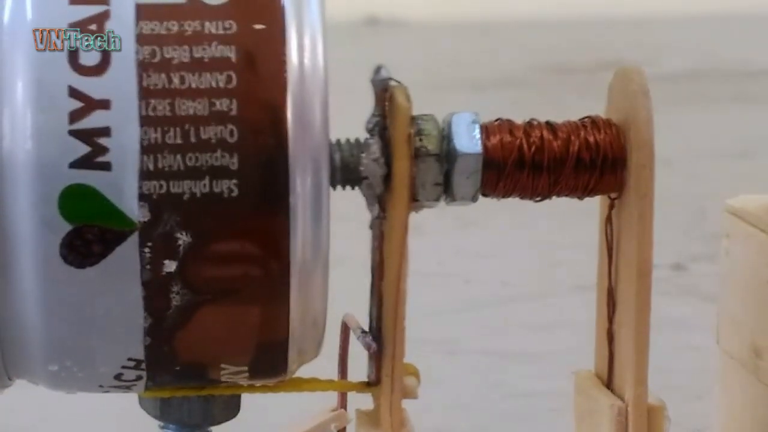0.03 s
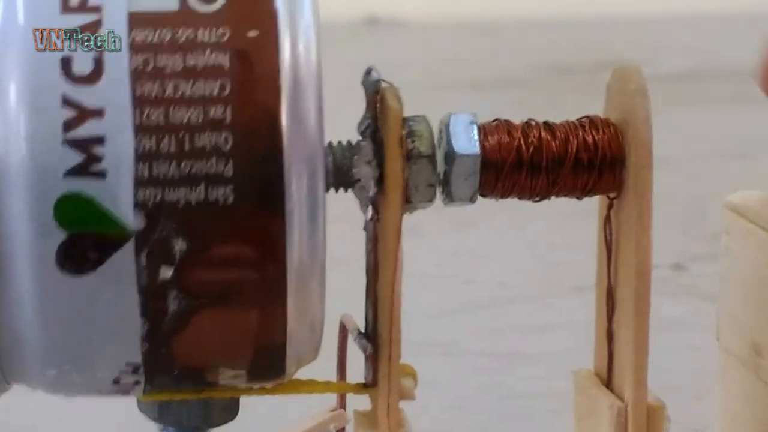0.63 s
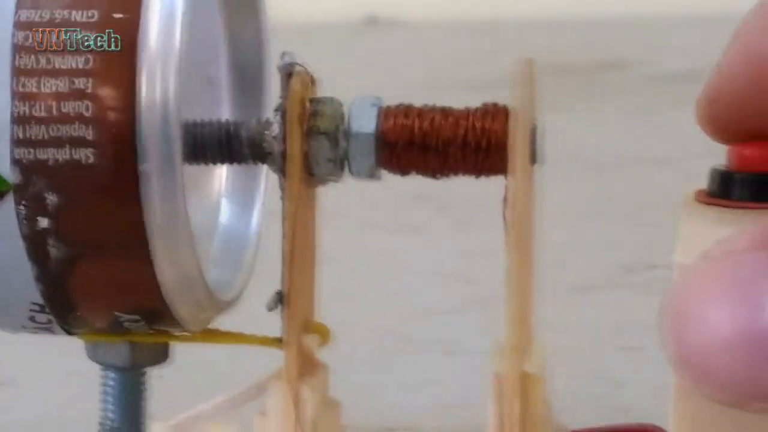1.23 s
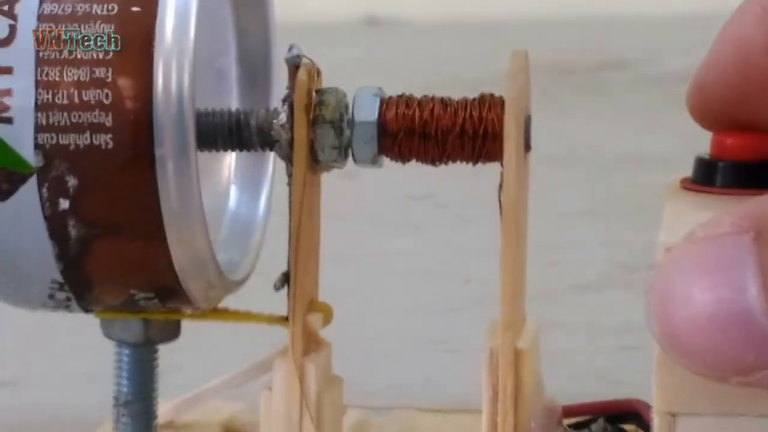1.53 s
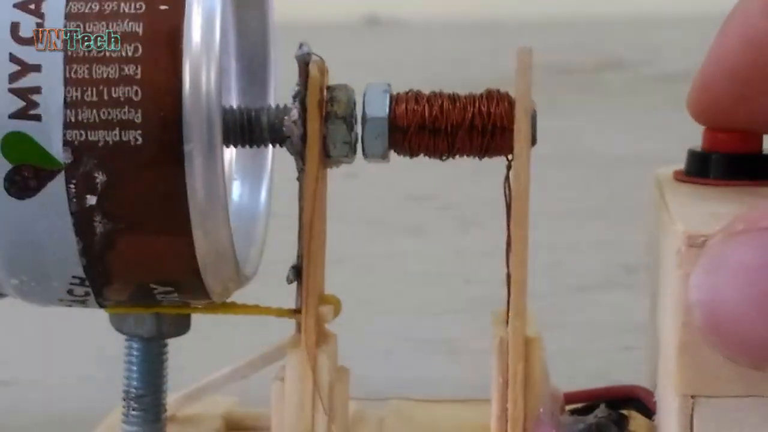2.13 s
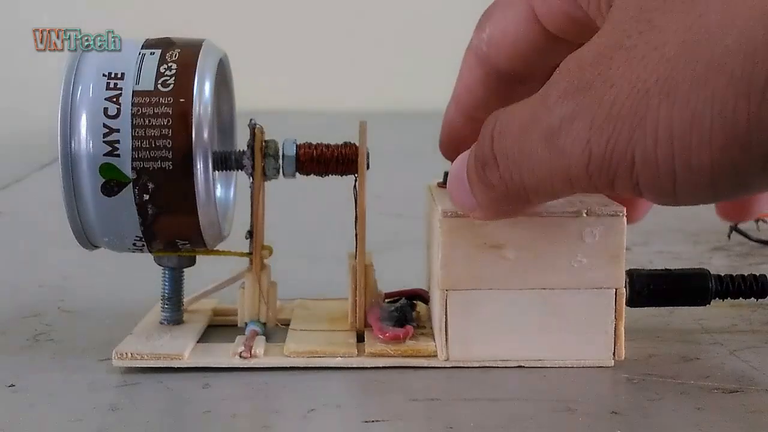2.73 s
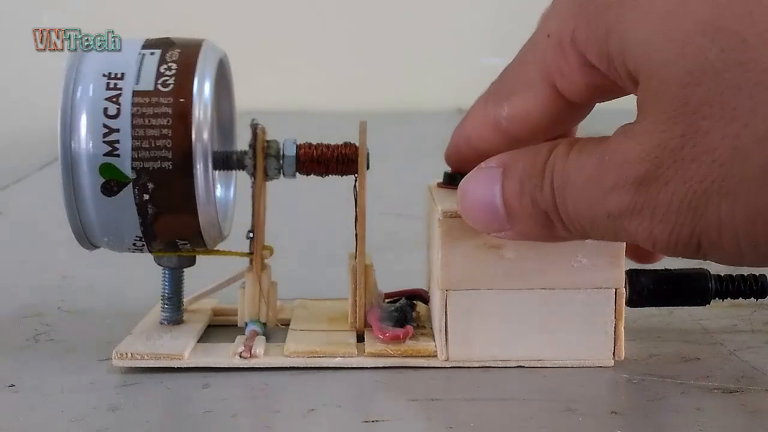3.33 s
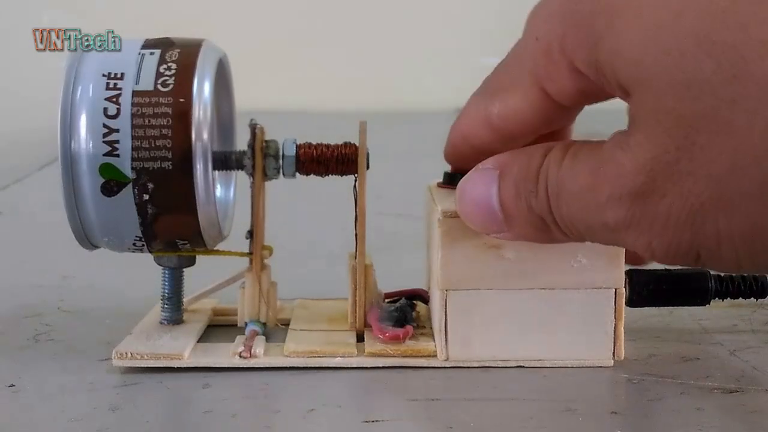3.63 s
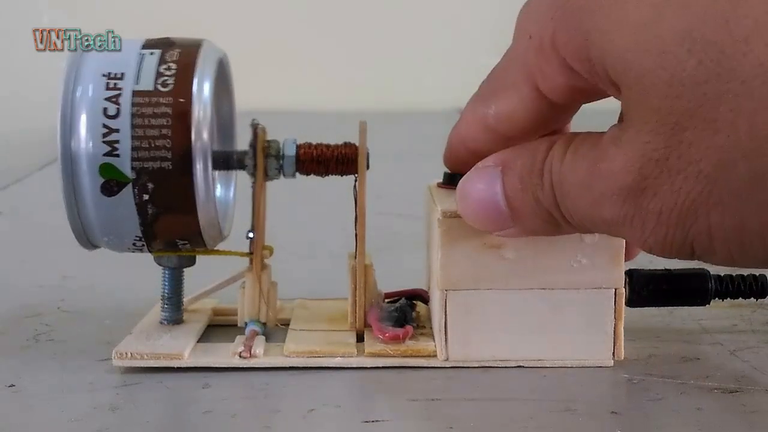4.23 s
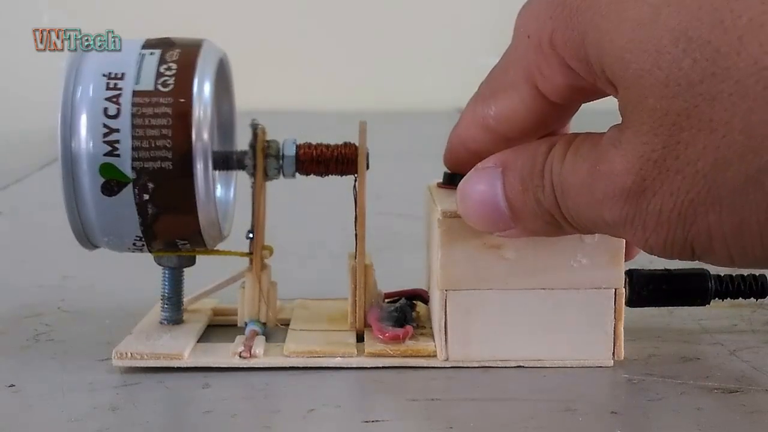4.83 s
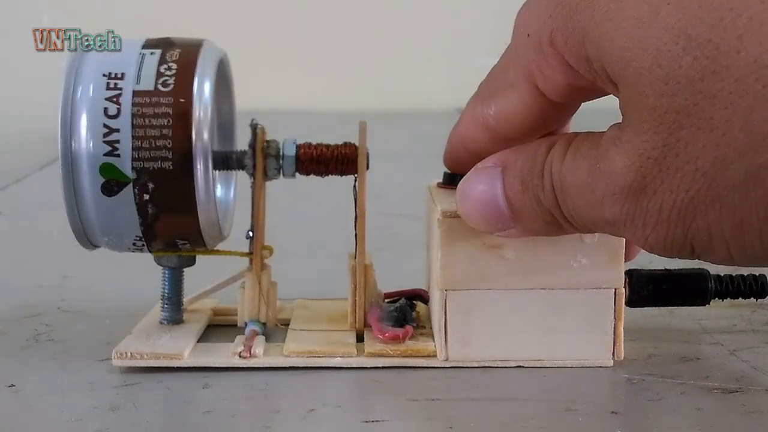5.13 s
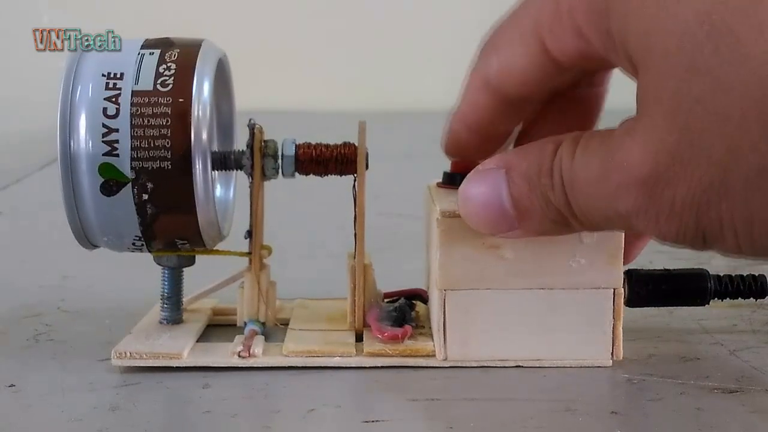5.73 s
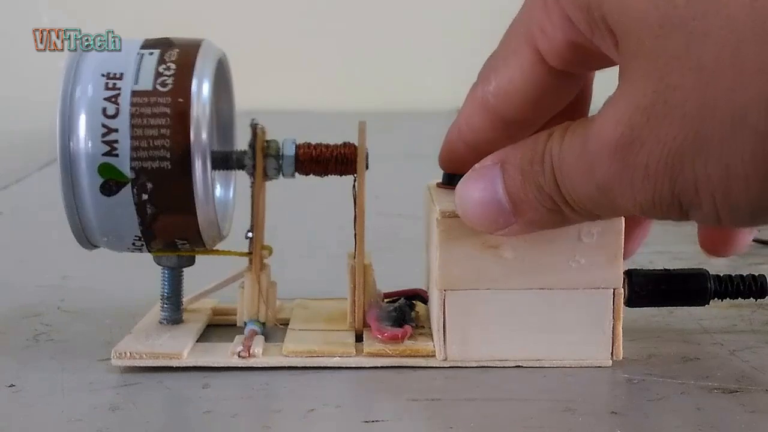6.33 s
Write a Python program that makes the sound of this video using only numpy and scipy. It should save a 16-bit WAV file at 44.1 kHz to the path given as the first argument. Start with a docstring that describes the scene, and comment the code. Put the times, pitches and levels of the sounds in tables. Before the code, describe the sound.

A homemade electric bell rattles harshly against a metal can in four rapid, stuttering bursts, with faint handling knocks in between.

```python
"""Homemade electric bell: a coil yanks a bolt against a cut-down drink can, about 80 uneven blows/s.
It rattles in four bursts as a push button is worked. Blows and light rebounds ring the can's wall
and rim modes and shake a wooden frame; a bare room carries the sound on.
In the pauses: a low distant drone with wavering hums, small handling knocks, faint rustle."""
import sys
import numpy as np
from scipy import signal
from scipy.fft import rfft, irfft, next_fast_len
from scipy.io import wavfile
from scipy.ndimage import uniform_filter1d, minimum_filter1d

SR = 44100
rng = np.random.default_rng(int(sys.argv[2]) if len(sys.argv) > 2 else 0)


def persist_wave(psi):
    """Save psi, clipped to +-1, as 16-bit WAV."""
    counts = np.round(np.clip(psi, -1, 1) * 32767).astype(np.int16)
    wavfile.write(sys.argv[1], SR, np.atleast_2d(counts).T)


N = 290619
T = np.arange(N) / SR

# Table levels are relative; the functions set each layer's gain.
# Bolt catches hard, swings a few blows, stumbles: first_s, last_s, count, first_db, later_db, chatter_db
BLOW_RUNS = [ (.003, .049, 5, -7, -13, -20.5), (0.0567, .0776, 3, -8, -17, -20.5),
             (.089, .1495, 6, -4, -11, -23.5), (0.1684, .2085, 5, -6.5, -15, -23),
             (0.2229, .2582, 4, -17.5, -14, -23.5), (0.271, .2925, 3, -12.5, -14, -22.5),
             (0.305, .3431, 4, -9, -14, -19), (.365, .4141, 5, -8, -10.5, -22),
             (.438, .4778, 4, -9, -11, -20.5), (0.4904, .526, 4, -14, -17, -21),
             (0.5396, .55, 2, -3, -23, -21.5), (3.4124, 3.501, 8, -12, -13.5, -22),
             (3.538, 3.538, 1, -11.5, -20, -21.5), (3.5621, 3.628, 6, -10.5, -24, -24),
             (3.6401, 3.731, 8, -9, -14.5, -23.5), (3.7676, 3.817, 5, -14.5, -14, -23),
             (4.2663, 4.318, 5, -11.5, -15.5, -22.5), (4.3346, 4.358, 3, -9, -14.5, -26.5),
             (4.372, 4.414, 4, -11.5, -14.5, -23.5), (4.4391, 4.48, 4, -9.5, -14.5, -23),
             (4.5054, 4.521, 2, -13.5, -10.5, -21.5), (4.533, 4.616, 7, -19, -13.5, -22.5),
             (4.6292, 4.6846, 5, -11.5, -19, -23.5), (4.7113, 4.81, 9, -15, -14.5, -22),
             (4.8554, 4.903, 5, -10.5, -17, -24.5), (4.9359, 4.9698, 4, -14.5, -14, -35),
             (4.987, 5.0485, 6, -7.5, -14.5, -25.5), (5.0725, 5.1165, 5, -10.5, -12, -20),
             (5.1308, 5.1453, 2, -15, -19, -24), (5.1685, 5.1685, 1, -12.5, -20, -34),
             (5.1904, 5.2255, 4, -7, -16.5, -22), (5.2345, 5.2973, 6, -14.5, -12, -21),
             (5.317, 5.3282, 2, -16.5, -12.5, -23), (5.351, 5.3624, 2, -19, -19, -28),
             (5.3742, 5.4705, 9, -12, -14.5, -24), (5.479, 5.54, 6, -11, -15, -24.5),
             (5.561, 5.5838, 3, -12.5, -13, -26.5), (5.6084, 5.6088, 1, -11, -20, -30),
             (5.633, 5.632, 1, -11.5, -20, -27), (5.6393, 5.6997, 5, -9, -13.5, -23),
             (5.712, 5.7515, 4, -17, -14, -24), (5.776, 5.776, 1, -13.5, -20, -26.5),
             (6.3208, 6.367, 5, -12, -13.5, -23), (6.3888, 6.3964, 2, -11.5, -12.5, -24),
             (6.4122, 6.4445, 4, -6, -14.5, -24.5), (6.473, 6.5515, 7, -7.5, -13.5, -22.5),
             (6.5794, 6.5792, 1, -15.5, -20, -20)]
# Hard blow spectrum: freq_hz, level_db
BLOW_SPECTRUM = [(100, -19), (300, -18), (1300, -18), (2200, -13.5), (3500, -14), (5300, -9.5),
                 (6400, -5.5), (7100, -6.5), (7900, 1), (9400, -1.5), (10300, -2.5), (11000, -8.5),
                 (14000, -16), (15800, -24.5)]
# Light rebound spectrum: freq_hz, level_db
REBOUND_SPECTRUM = [(100, -12.5), (300, -13.5), (1400, -11), (3000, -5.5), (5300, -5.5), (6400, -6.5),
                    (7000, -2.5), (7900, 1), (9400, -7.5), (10300, -11.5), (11000, -8), (14000, -9),
                    (15800, -27)]
# Room tail decay: freq_hz, t60_s
TAIL_DECAY = [(150, 0.96), (600, 2), (2000, 2), (4500, 1.6), (8000, 1.22), (12000, 1.1), (16000, 1)]
# Room tail spectrum: freq_hz, level_db
TAIL_SPECTRUM = [(150, 1.5), (600, 3.5), (2000, 0), (5000, -2), (8000, -1), (12000, -5), (16000, 1.5)]
# Thin can wall modes: pitch_hz, gain_db, t60_s
WALL_MODES = [(597, -2, .1), (830, -7, .03), (1130, -8, .02), (2880, -4, .06), (5330, -4, .03),
              (6310, -5, .04), (6450, -4, .02), (7850, -7, .02), (10300, -7, .012), (15560, -1, .02),
              (3110, -2, .03), (4180, -5, .025), (4380, -5, .025), (4610, 0, .12), (7202, 2, .12)]
# Extra wall modes, by spot struck: start_s, end_s, pitch_hz, gain_db, t60_s
SPOT_MODES = [(0, 2, 3080, 2, .1), (0, 2, 5260, -4, .1), (0, 2, 6290, -3.5, .1), (3, 4.7, 4612, 7, .35),
              (3, 4.25, 4300, -1, .04), (3, 3.9, 7205, 0, .2)]
# Frame response to the blows: time_s, gain_db
FRAME_GAIN = [(0, -4.5), (3.4, 4.5), (3.8, 2), (4.3, 6), (5.0, 10.5), (5.7, 11), (6.4, 6)]
# Long can modes, lower then upper: pitch_hz, width_hz
RIM_MODES = [(2213, 4), (6400, 90)]
# Feed from the struck spot to the rim modes: time_s, lower_db, upper_db
RIM_COUPLING = [(0, -32, -26), (.6, -29.5, -13.5), (3.45, -20.5, -6.5), (3.8, -9, 0), (4.3, -17.5, -6),
                (4.7, -16.5, -9.5), (5.25, -20.5, -12), (5.45, -28, -24), (5.8, -26, -19), (6.35, -20, -11)]
# Set swells of the lower rim mode, as from blows in step with it: time_s, level_db
RIM_SWELLS = [(.328, -29.5), (.56, -28.5), (3.515, -25.5), (3.58, -32), (3.72, -25), (4.456, -31),
              (4.558, -30.5), (4.672, -24), (5.07, -31.5), (5.235, -31), (5.608, -35), (6.369, -27),
              (6.52, -30)]
# Distant drone levels: time_s, low_db, upper_db
DRONE_LEVELS = [(0, -46.5, -67), (1.2, -41.5, -59.5), (2.2, -39.5, -56.5), (2.3, -40.5, -45),
                (3.3, -40, -46), (3.6, -47.5, -55), (4.2, -44.5, -48.5), (5.001, -48, -51),
                (6.59, -46.5, -47.5)]
# Low drone spectrum: freq_hz, level_db
DRONE_SPECTRUM = [(12, -72.5), (20, -60), (45, -9.5), (80, -10.5), (130, -0.5), (161, -6), (203, -4.5),
                  (280, -17.5), (316, -29), (403, -27.5), (474, -39), (500, -26), (650, -51), (1100, -120)]
# Room air spectrum: freq_hz, level_db
AIR_SPECTRUM = [(200, -23.5), (400, -2.5), (620, -5.5), (800, -5), (1100, -9.5), (1700, -14), (2800, -16),
                (3900, -18.5), (4500, -28.5), (7000, -30), (9200, -28.5), (11000, -45.5), (14000, -39.5)]
# Hums within the drone: start_s, end_s, pitch_hz, level_db
HUM_TONES = [(0, 6.59, 134, -56), (1.05, 1.4, 196, -50), (1.72, 2.22, 133, -41.5), (2.45, 2.9, 281, -54.5),
             (3.02, 3.2, 287, -46), (3.12, 3.3, 138.7, -41.5), (3.9, 4.95, 135.5, -49.5)]
# Hand on the button box: start_s, level_db, pitch_hz, t60_s, tick_db
BOX_KNOCKS = [(0.949, -42, 790, .08, -54), (1.079, -48, 770, .04, -46), (1.599, -55.5, 550, 0.033, -56),
              (2.255, -41, 75, .1, -50), (2.759, -33, 786, 0.036, -58.5)]
# Brushes of handling: start_s, end_s, level_db
HAND_BRUSHES = [(1.084, 1.148, -46.5), (1.2, 1.68, -60), (1.575, 1.603, -58.5), (2.004, 2.17, -59),
                (2.76, 2.803, -62.5)]
# Stereo width: freq_hz, side_to_mid_db
STEREO_WIDTH = [(100, -58), (400, -39.5), (800, -34), (1500, -31), (2800, -19.5), (4500, -43.5),
                (9000, -75.5), (14000, -21.5)]


def amp(db):
    """Decibels to gain."""
    return 10 ** (np.asarray(db) / 20)


def unit(x):
    """Scale to rms 1."""
    return x / np.sqrt(np.mean(x ** 2) + 1e-20)


def lookup(points, hz):
    """Interpolate a table over log frequency."""
    points_hz, values = np.transpose(points)
    return np.interp(np.log(hz + 1), np.log(points_hz + 1), values)


def add(mix, start_s, sound):
    """Mix a sound in at start_s."""
    start = round(start_s * SR)
    sound = sound[max(-start, 0):]
    part = mix[max(start, 0):][:len(sound)]
    part += sound[:len(part)]


def convolve(x, response):
    """Convolve, trim to N."""
    return signal.fftconvolve(x, response)[:N]


def impulse(spectrum, size=2048):
    """Sharp-fronted impulse response, energy 1."""
    level_db = lookup(spectrum, abs(np.fft.fftfreq(size, 1 / SR)))
    log_gain = np.log(amp(np.maximum(level_db, -90)))
    response = np.fft.ifft(np.exp(np.conj(signal.hilbert(log_gain)))).real
    return response / np.linalg.norm(response)


def noise(spectrum):
    """Noise of rms 1, shaped by rows of freq_hz, level_db."""
    size = next_fast_len(N, True)
    gain = amp(lookup(spectrum, np.fft.rfftfreq(size, 1 / SR)))
    return unit(irfft(rfft(rng.standard_normal(size)) * gain, size)[:N])


def envelope(start_s, end_s, db, rise_db_per_s, fall_db_per_s):
    """Gain that rises, holds from start_s to end_s, then falls."""
    drop_db = rise_db_per_s * np.maximum(start_s - T, 0) + fall_db_per_s * np.maximum(T - end_s, 0)
    return amp(np.maximum(db - drop_db, -150))


def resonate(x, hz, t60_s):
    """Resonator, gain 1 at centre."""
    q = hz * t60_s * np.pi / np.log(1000)
    return signal.lfilter(*signal.iirpeak(hz, q, SR), x)


def stored(blows, t60_s):
    """Amplitude of a mode that gathers and leaks blow energy."""
    retain = np.exp(-2 * np.log(1000) / (t60_s * SR))
    return np.sqrt(signal.lfilter([1 - retain], [1, -retain], blows ** 2))


def ping(hz, t60_s):
    """Decaying sine, 1 s."""
    t = T[:SR]
    return np.sin(2 * np.pi * hz * t) * np.exp(-np.log(1000) * t / t60_s)


def contact(snap, rise_s=.00046, scrape_s=.00082, lead_in_s=.0016, buzz_s=.004, size=1200):
    """One blow: faint noise swells just before the hit; the bolt scrapes, snaps the wall, buzzes off."""
    t = (np.arange(size) - size // 4) / SR
    before = np.exp(-abs(t) / rise_s) + amp(-20) * np.exp(-abs(t) / lead_in_s)
    after = np.exp(-abs(t) / scrape_s) + amp(-18) * np.exp(-abs(t) / buzz_s)
    force = np.where(t < 0, before, after) * rng.choice([-1., 1.], size)
    force[size // 4] += snap
    return force


def hammer(gain_db=20.5, jitter_s=.0004, spread_db=2, snap_spread_db=3.5):
    """Bolt hits the can in runs; some blows land clean, others scrape."""
    out, colour = np.zeros(N), impulse(BLOW_SPECTRUM)
    for first_s, last_s, count, first_db, later_db, _ in BLOW_RUNS:
        for k, hit_s in enumerate(np.linspace(first_s, last_s, round(count))):
            late, strong, clean = rng.standard_normal(3)
            hit_s += jitter_s * late if k else 0
            db = later_db + spread_db * strong if k else first_db
            force = contact(snap=3.1 * amp(snap_spread_db * clean))
            blow = signal.fftconvolve(force, colour)
            add(out, hit_s - len(force) // 4 / SR, amp(db + gain_db) * blow / np.linalg.norm(blow))
    return out


def chatter(rate_hz=450, spread_db=3, grain_s=.0013, hold_s=.0079, gain_db=-4):
    """Light random rebounds of bolt and contact, each a dying scrape; they settle after each run."""
    taps = (rng.random(N) < rate_hz / SR) * amp(spread_db * np.clip(rng.standard_normal(N), -2, 1))
    energy = signal.lfilter([1], [1, -np.exp(-1 / (grain_s * SR))], taps ** 2)
    grains = np.sqrt(energy) * rng.standard_normal(N)
    effort = np.zeros(N)
    for first_s, last_s, *_, db in BLOW_RUNS:
        run = envelope(first_s, last_s + hold_s, db, rise_db_per_s=8000, fall_db_per_s=402)
        effort = np.maximum(effort, run)
    return amp(gain_db) * convolve(effort * unit(grains), impulse(REBOUND_SPECTRUM))


def room(x, early_db=-8, late_db=-9, early_t60_s=.22, build_s=.0079, delay_s=.002, count=7):
    """Quick reflections, then a long tail. Blows radiate differently, so responses take random turns."""
    t, out = T[:3 * SR // 2], np.zeros(N)
    turn = rng.integers(0, count, N // 512 + 1)[np.arange(N) // 512]
    for k in range(count):
        early = rng.standard_normal(len(t)) * (rng.random(len(t)) < 2500 / SR)  # 2500 echoes/s
        early *= amp(-60 * t / early_t60_s) * (t > delay_s)
        hz, age_s, bands = signal.stft(rng.standard_normal(len(t)), SR, nperseg=256)
        bands *= amp(lookup(TAIL_SPECTRUM, hz)[:, None] - 60 * age_s / lookup(TAIL_DECAY, hz)[:, None])
        late = signal.istft(bands, SR, nperseg=256)[1][:len(t)] * (1 - np.exp(-t / build_s))
        early *= amp(early_db) / np.linalg.norm(early)
        late *= amp(late_db) / np.linalg.norm(late)
        out += convolve(x * (turn == k), early + late)
    return out


def can_wall(blows):
    """Blows ring the wall's short modes; the spot struck favours some."""
    common = sum(amp(db) * resonate(blows, hz, t60_s) for hz, db, t60_s in WALL_MODES)
    spot = sum(amp(db) * resonate(blows * (T >= start_s) * (T < end_s), hz, t60_s)
               for start_s, end_s, hz, db, t60_s in SPOT_MODES)
    return common + spot


def frame(blows, body_hz=385, t60_s=.12):
    """Recoil shakes the wooden frame."""
    return amp(np.interp(T, *np.transpose(FRAME_GAIN))) * resonate(blows, body_hz, t60_s)


def can_rim(blows, lower_db=-2, upper_db=-6, lower_t60_s=.88, upper_t60_s=.29):
    """Long modes build under the blows and ring on: a fluttering tone below, a beating cluster above."""
    (lower_hz, lower_width_hz), (upper_hz, upper_width_hz) = RIM_MODES
    time_s, lower_feed_db, upper_feed_db = np.transpose(RIM_COUPLING)
    swells = sum(envelope(at_s, at_s, db + lower_db, rise_db_per_s=600.5, fall_db_per_s=260)
                 for at_s, db in RIM_SWELLS)
    lower = stored(blows, lower_t60_s) * amp(lower_db + np.interp(T, time_s, lower_feed_db))
    upper = stored(blows, upper_t60_s) * amp(upper_db + np.interp(T, time_s, upper_feed_db))
    drift_rad = np.cumsum(rng.standard_normal(N)) * np.sqrt(2 * np.pi * lower_width_hz / SR)
    flutter = 1 + .3 * noise([(2, -2), (25, 2), (70, -28), (300, -90.5)])
    tone = np.sqrt(2) * np.sin(2 * np.pi * lower_hz * T + drift_rad) * flutter
    band = signal.iirpeak(upper_hz, upper_hz / upper_width_hz, SR)
    cluster = unit(signal.lfilter(*band, rng.standard_normal(N)))
    return np.hypot(lower, swells) * tone + upper * cluster


def drone(low_gain_db=-3, upper_gain_db=-4, rumble_db=-59):
    """Distant drone: two noise bands of shifting level over a steady deep rumble."""
    time_s, low_db, upper_db = np.transpose(DRONE_LEVELS)
    low = amp(low_gain_db + np.interp(T, time_s, low_db)) * noise(DRONE_SPECTRUM)
    upper = noise([(150, -36.5), (225, -2), (290, -.5), (340, -8), (420, -10), (800, -34), (2000, -71.5)])
    upper *= amp(upper_gain_db + np.interp(T, time_s, upper_db))
    rumble = noise([(5, -20), (25, -19.5), (60, 1), (100, -4.5), (300, -53), (1000, -89.5)])
    return low + upper + amp(rumble_db) * rumble


def air(level_db=-54):
    """Steady hiss of room air."""
    return amp(level_db) * noise(AIR_SPECTRUM)


def hums(gain_db=-1, waver_hz=1.84, fade_db_per_s=109.5):
    """Distant low tones waver, come and go."""
    out = np.zeros(N)
    for start_s, end_s, hz, db in HUM_TONES:
        pitch_hz = hz + waver_hz * noise([(1, 1.5), (6, .5), (20, -43), (100, -100)])
        gain = envelope(start_s, end_s, db + gain_db, fade_db_per_s, fade_db_per_s)
        out += gain * np.sqrt(2) * np.sin(2 * np.pi * np.cumsum(pitch_hz) / SR)
    return out


def knocks(tick_s=.003):
    """Hand bumps the button box: a short hollow note and a tick."""
    out = np.zeros(N)
    for start_s, db, hz, t60_s, tick_db in BOX_KNOCKS:
        tick = rng.standard_normal(SR) * np.exp(-T[:SR] / tick_s)
        body = ping(hz, t60_s) + .5 * ping(hz * 1.18, t60_s / 2)
        add(out, start_s, amp(db) * body + amp(tick_db) * tick)
    return out


def rustle(gain_db=-3, fade_db_per_s=151.5):
    """Handling: faint brushes of high noise."""
    brushes = sum(envelope(*brush, fade_db_per_s, fade_db_per_s) for brush in HAND_BRUSHES)
    hiss = noise([(3000, 0), (6000, -4), (8500, 7), (11000, -3), (15000, -13.5)])
    return amp(gain_db) * brushes * hiss


def scene():
    """Bell in the room, handling and background; nearly mono."""
    blows = hammer() + chatter()
    blows += room(blows)
    bell = blows + can_wall(blows) + frame(blows) + can_rim(blows)
    mid = bell + knocks() + drone() + rustle() + air() + hums()
    width = amp(lookup(STEREO_WIDTH, np.fft.rfftfreq(N, 1 / SR)))
    side = irfft(1j * rfft(mid) * width, N)  # 90 degrees from mid
    return np.array([mid + side, mid - side])


def record(dry, ceiling=.91, window_samples=45, cutoff_hz=15850):
    """Fast peak limiter, then low-pass."""
    allowed = np.minimum(1, ceiling / (abs(dry).max(0) + 1e-9))
    gain = uniform_filter1d(minimum_filter1d(allowed, window_samples), window_samples)
    lowpass = signal.firwin(401, cutoff_hz, window=("kaiser", 8), fs=SR)
    return signal.oaconvolve(dry * gain, lowpass[None], "same")


dry = scene()
out = record(dry)
persist_wave(out)
```